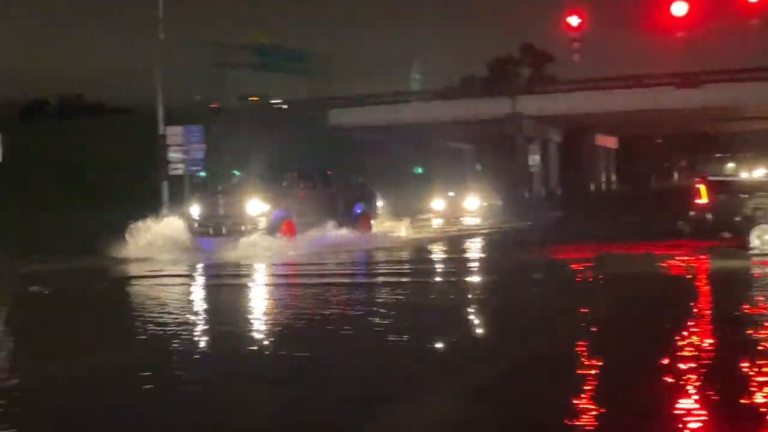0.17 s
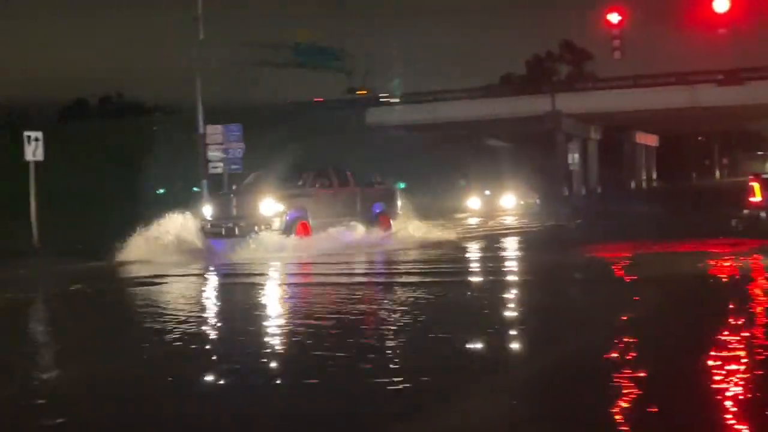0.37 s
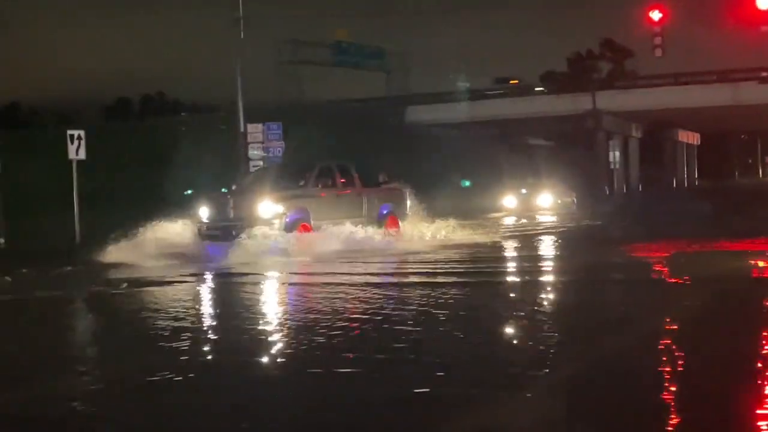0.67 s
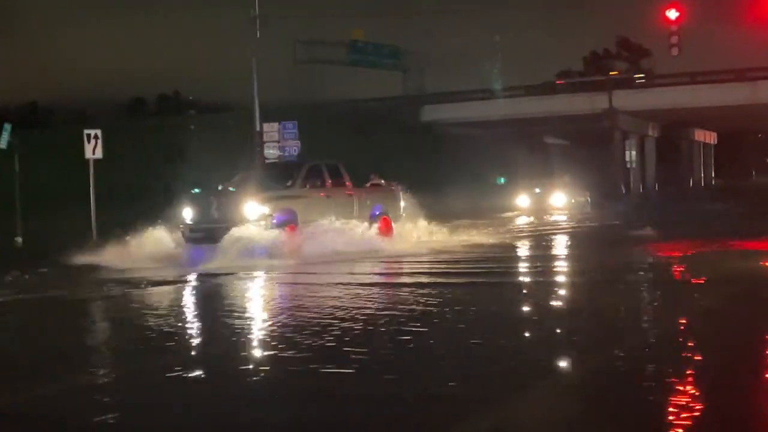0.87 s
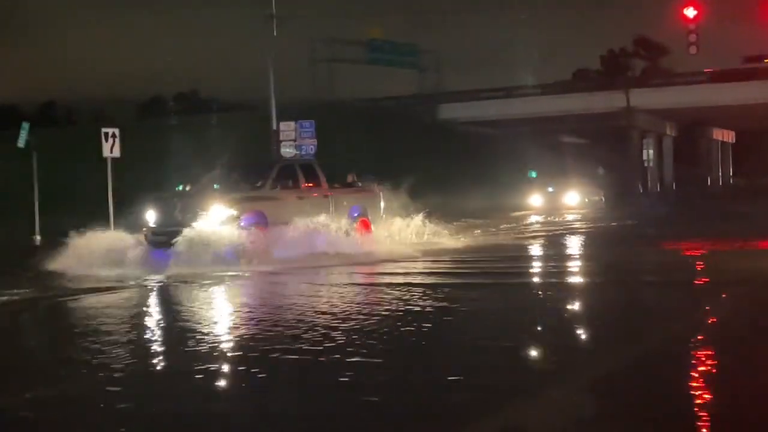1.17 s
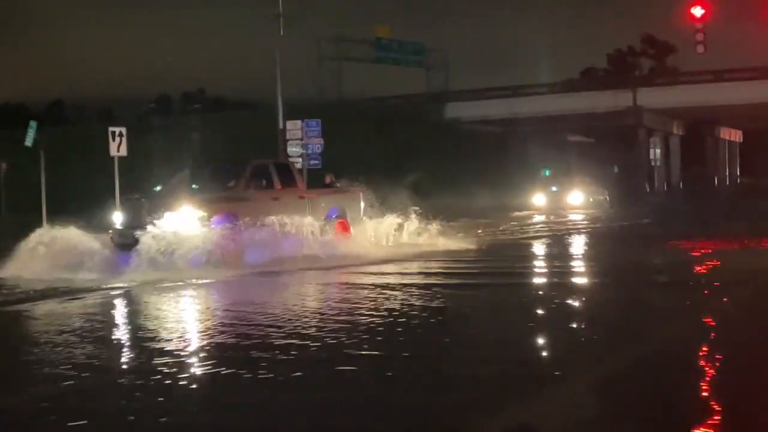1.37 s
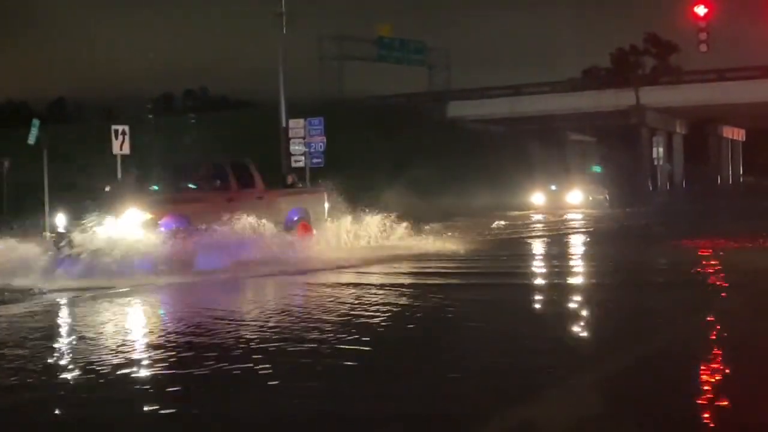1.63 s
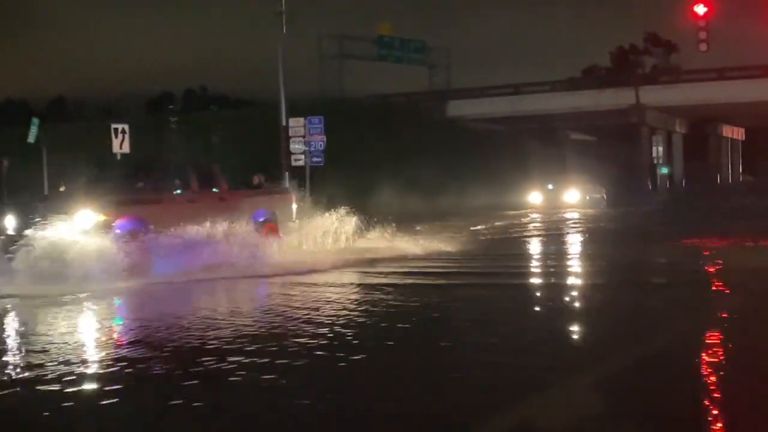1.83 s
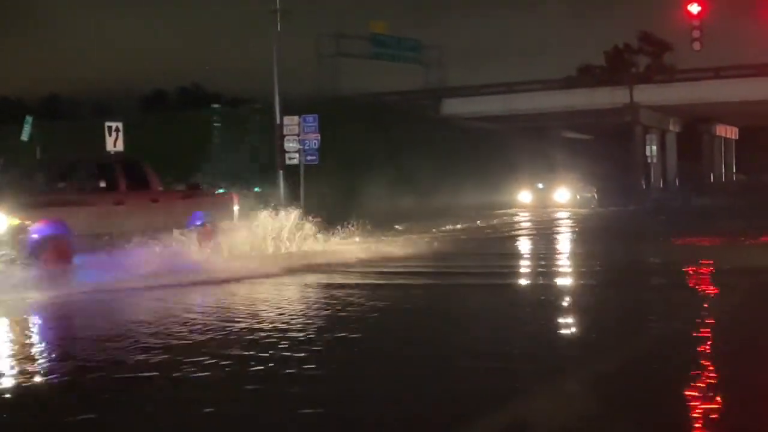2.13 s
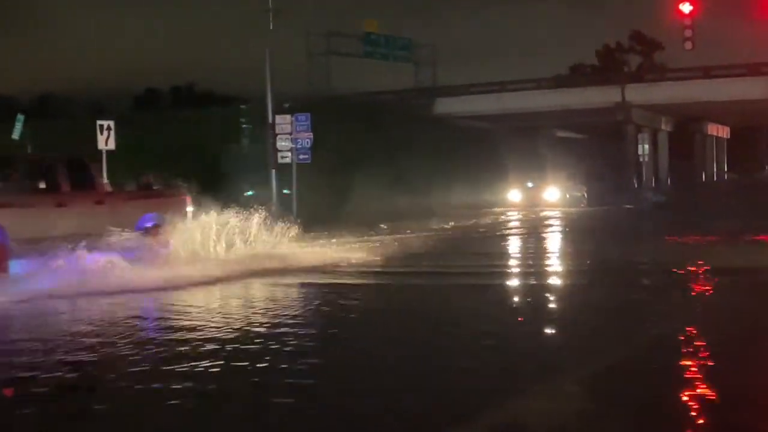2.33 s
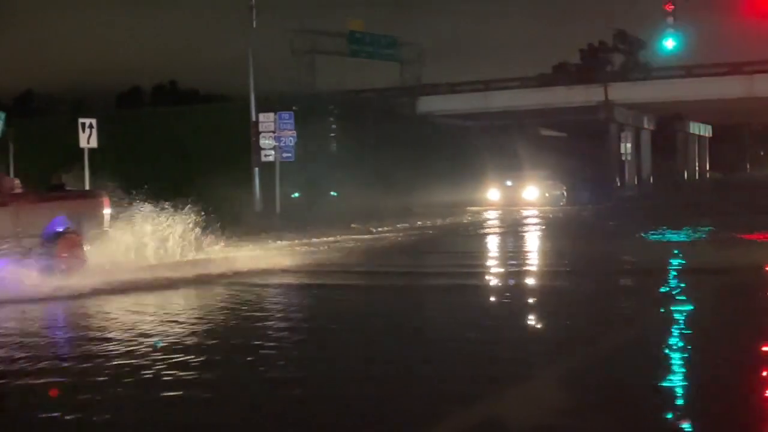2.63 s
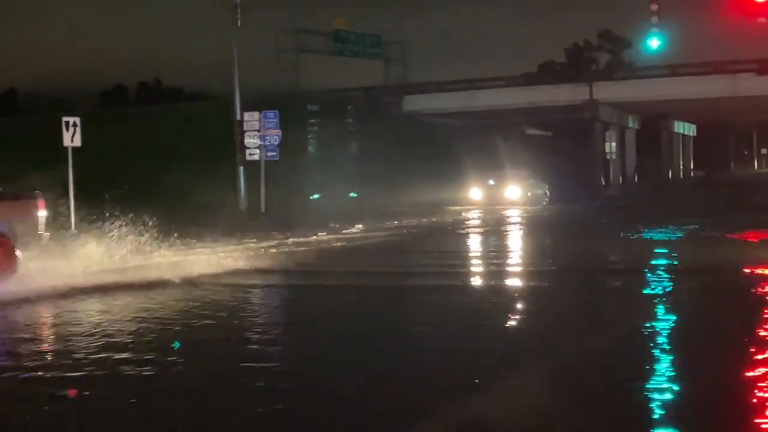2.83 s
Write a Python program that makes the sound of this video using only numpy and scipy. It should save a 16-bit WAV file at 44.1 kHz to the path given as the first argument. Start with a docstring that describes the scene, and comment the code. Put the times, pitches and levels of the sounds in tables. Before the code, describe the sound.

A pickup's burbling engine pushes through deep floodwater, with churning, sloshing water and growing spray hiss.

```python
"""An eight-cylinder pickup burbles through a flooded street and passes to the left, a few metres away.
Its exhaust, growl and tailpipe boom are sums of cosines at multiples of one engine cycle.
Around it water churns, sloshes and surges and spray hisses: coloured noise, with tiny rings for bubbles and drops.
The spray gets louder over the scene; a second engine, one wavering sine, hums farther off and fades."""
import sys
import numpy as np
from scipy import signal
from scipy.fft import rfft, irfft
from scipy.io import wavfile
from scipy.ndimage import uniform_filter1d

SR = 44100
rng = np.random.default_rng(int(sys.argv[2]) if len(sys.argv) > 2 else 0)


def waveform_to_disk(signal):
    """Save audio, clipped to [-1, 1], as 16-bit WAV at the path in sys.argv[1]."""
    frames = np.transpose(np.atleast_2d(signal))
    scaled = np.clip(frames, -1, 1) * 32767
    samples = np.round(scaled).astype(np.int16)
    wavfile.write(sys.argv[1], SR, samples)


N = 132300
T = np.arange(N) / SR  # seconds

# Pickup engine speed. Each row: time in seconds, firing rate in Hz.
FIRING_RATE = [(0, 104.9), (.5, 109.4), (1, 111.2), (1.4, 114.3), (1.8, 116.1), (2.1, 112.6), (2.4, 109.9),
               (2.7, 104.9), (3, 102.9)]
CYLINDERS = 8  # firings per engine cycle
# Exhaust loudness. Each row: time in seconds, level in dB.
EXHAUST_LEVEL = [(0, -29), (.3, -27), (.42, -29.5), (.5, -24.5), (.85, -25.3), (.95, -23.8), (1.3, -23.8),
                 (1.45, -21.5), (1.58, -26), (1.8, -22), (2.01, -27.5), (2.12, -22.5), (2.25, -27),
                 (2.38, -27), (2.57, -33), (2.66, -28.5), (3, -30)]
# Exhaust colour. Each row: multiple of the engine cycle, relative level in dB.
EXHAUST_ORDERS = [(4, -20), (5, -14.5), (6, -19.5), (7, -5.5), (8, 1.5), (9, -11), (10, -14), (11, -21)]
# Growl of the engine, heard while it faces us. Each row: multiple of the engine cycle, relative level in dB.
GROWL_ORDERS = [(16, 0.5), (17, 0), (19, -7), (21, -3), (24, -9)]
# Growl loudness. Each row: time in seconds, level in dB.
GROWL_LEVEL = [(0, -42), (.8, -40.5), (1.25, -35.5), (1.85, -33.5), (2.05, -36.5), (2.25, -46.5), (3, -44)]
BOOM_ORDER = 3  # tailpipe boom, as a multiple of the engine cycle
# Tailpipe boom loudness. Each row: time in seconds, level in dB.
BOOM_LEVEL = [(0, -60), (1.7, -52), (2.3, -44), (3, -40)]
# Distant engine. Each row: time in seconds, firing rate in Hz, level in dB.
FAR_ENGINE = [(0, 132, -28), (.35, 133.5, -28), (.6, 136, -31), (.85, 137, -37), (1.4, 137.6, -43),
              (3, 136.7, -61)]

# Colour of the bow wave. Each row: frequency in Hz, relative density in dB per Hz.
WAVE_COLOUR = [(200, -39), (340, -12), (450, -1.5), (570, -3.5), (750, -1), (1080, -1), (1250, -3.5),
               (1480, -4), (1700, -9.5), (1900, -8), (2200, -13.5), (3500, -20.5), (8000, -64)]
# Colour of the spray. Each row: frequency in Hz, relative density in dB per Hz.
SPRAY_COLOUR = [(700, -16), (1700, -5), (2600, 1), (3600, -.5), (5400, -2), (5900, -5), (6800, -10),
                (7800, -10), (8800, -11), (10500, -7.3), (13400, -7.2), (14600, -9), (15800, -14)]
# Colour of the low churn. Each row: frequency in Hz, relative density in dB per Hz.
RUMBLE_COLOUR = [(22, -42), (31, -28), (42, -12), (65, -1), (100, -4), (150, -.5), (200, -3.5), (250, -7),
                 (330, -7.5), (450, -10), (700, -33), (1500, -78)]
# Water noise loudness. Each row: time in seconds, rumble in dB, bow wave in dB, spray in dB.
WATER_LEVEL = [(0, -27.5, -34, -39), (.3, -29.5, -32, -40), (.55, -30.5, -32, -38.5),
               (.7, -30.5, -31.5, -38.5), (1.1, -30.5, -31.5, -37), (1.35, -30.5, -32.5, -37),
               (1.72, -31, -32, -36), (1.9, -31, -31, -34.7), (2.2, -30.5, -31, -34.7),
               (2.5, -30.5, -32, -35.7), (2.67, -28, -31, -35), (3, -27.5, -31.5, -34.3)]
# Single surges, from deep heaves to bright splashes.
# Each row: crest time in seconds, length in seconds, centre in Hz, crest level in dB.
SURGES = [(.24, .16, 780, -35), (.38, .16, 66, -32), (.68, .15, 860, -33.5), (.88, .22, 464, -33),
          (1.07, 0.17, 636, -36), (1.172, 0.22, 328, -35), (1.297, 0.14, 237, -34.5),
          (1.48, .18, 1400, -36.5), (1.64, .14, 72, -33), (1.82, 0.2, 74, -33), (1.89, .12, 1550, -34),
          (2.41, .16, 770, -35), (2.52, .2, 1200, -33.5)]
SURGE_OCTAVES, SURGE_RISE = .36, .4  # half width of a surge's band; share of its length before the crest
# Colour of the slosh against the body. Each row: frequency in Hz, relative density in dB per Hz.
SLOSH_COLOUR = [(170, -34), (255, 0.5), (370, 0), (650, -5.5), (1100, -29.5)]
# Slosh loudness. Each row: time in seconds, level in dB.
SLOSH_LEVEL = [(0, -52), (.85, -39), (1.35, -37), (1.8, -41), (2.2, -54), (3, -54)]
# Colour of the tail spray falling back. Each row: frequency in Hz, relative density in dB per Hz.
FALLBACK_COLOUR = [(3000, -28), (5200, -6), (6200, 5.5), (7200, 3), (8400, -4), (12000, -29)]
# Tail spray loudness. Each row: time in seconds, level in dB.
FALLBACK_LEVEL = [(0, -72), (1.6, -67), (2.2, -45.5), (3, -41)]

# Stereo width of the water. Each row: frequency in Hz, left-right likeness (clipped to 0-1).
LIKENESS = [(40, 0.8), (400, .92), (570, .6), (800, .84), (1150, .88), (1450, .99), (1700, .999),
            (2300, .999), (2900, .97), (3300, .88), (5000, .82), (8100, .72), (8400, .999), (9100, .99),
            (10000, .73), (12600, .78), (12900, 1.1)]
# Stereo lean of the water. Each row: frequency in Hz, left over right in dB at a lean share of 1.
LEAN = [(100, -1.3), (280, .9), (470, 0), (650, 8), (850, 4.7), (1220, 4), (1420, 0)]
LEAN_START, LEAN_PER_S = 0.2, 0.3  # lean share at the start; its growth per second
# Water reaches the two microphone ports out of step. Each row: frequency in Hz, left lead in radians.
PORT_PHASE = [(100, 0), (350, .15), (570, .55), (800, .1), (1100, .2), (1400, 0), (2400, 0), (3200, .35),
              (4200, .22), (5000, .55), (5350, .1), (5800, -1.55), (6300, -.95), (6900, -.85), (7550, -2.3),
              (8100, -2.45), (8400, -3.14), (9100, -3.2), (9900, -4), (11000, -4.65), (12650, -5.7),
              (12900, -6.283)]

# Rings per second in each channel, level in dB against the noise they sit in, spread of strength in dB.
BUBBLES_PER_S, BUBBLES_DB, BUBBLE_SPREAD_DB = 500, -8, 3.5
DROPS_PER_S, DROPS_DB, DROP_SPREAD_DB = 1800, -8, 2.5
EDGE_HZ = 15830  # top of the recorder's band


def amp(db):
    """Decibels to gain."""
    return 10 ** (np.asarray(db) / 20)


def unit(x):
    """Scales to rms 1."""
    return x / np.sqrt(np.mean(x ** 2) + 1e-20)


def curve(table, column=1):
    """One column of a time table, at every sample."""
    columns = np.transpose(table)
    return np.interp(T, columns[0], columns[column])


def colour(table, hz):
    """Reads a frequency table on a log-frequency axis."""
    table_hz, value = np.transpose(table)
    return np.interp(np.log(hz + 1), np.log(table_hz + 1), value)


def drift(hz):
    """Slow random waver up to about hz, rms 1."""
    f = np.fft.rfftfreq(N, 1 / SR)
    spectrum = rfft(rng.standard_normal(N)) / (1 + (f / hz) ** 4)
    return unit(irfft(spectrum, N))


def rush(spectrum, patchy_db, flicker_db, size=512):
    """Stereo water noise that comes in short patches of time and pitch, rms 1."""
    hz, _, z = signal.stft(rng.standard_normal((2, N)), SR, nperseg=size)
    # Blurring across pitch, then time, sets the patch size; both channels share the patches.
    patches = uniform_filter1d(rng.standard_normal(z.shape[1:]), size=7, axis=0)
    patches = unit(uniform_filter1d(patches, size=10, axis=1))
    noise = signal.istft(z * amp(patchy_db * patches), nperseg=size)[1][:, :N]
    tint = amp(colour(spectrum, np.fft.rfftfreq(N, 1 / SR)))
    noise = irfft(rfft(noise) * tint, N)
    return unit(noise * amp(flicker_db * drift(15)))


def grains(per_s, low_hz, high_hz, cycles, glide, spread_db, count=36):
    """Random small rings of many pitches, each rising a little as it dies, rms 1 in all."""
    out = np.zeros((2, N))
    for hz in np.geomspace(low_hz, high_hz, count):
        age = np.arange(4096) / SR * hz / cycles  # 1 = the given number of cycles
        envelope = np.exp(-3 * age) * (1 - np.exp(-20 * age))
        phase = 2 * np.pi * cycles * age * (1 + glide * np.minimum(age, 2))
        ring = envelope * np.sin(phase)
        starts = rng.random((2, N)) < per_s / count / SR
        hits = starts * amp(spread_db * np.minimum(rng.exponential(1, N), 4))
        out += signal.oaconvolve(hits, unit(ring)[None], axes=1)[:, :N]
    return unit(out)


def pickup(jitter=0.002, rough=0.13, growl_rough=0.37, balance_db=-1.3):
    """Unevenly spaced firings give lines at multiples of the engine cycle, not only at the firing rate."""
    firing_hz = curve(FIRING_RATE) * (1 + jitter * drift(9.1))
    turns = np.cumsum(firing_hz) / CYLINDERS / SR  # engine cycles so far

    def lines(orders, waver):
        """Engine lines that each waver in strength, rms 1 together."""
        total = 0
        for order, db in orders:
            strength = amp(db) * (1 + waver * drift(14.3))
            total = total + strength * np.cos(2 * np.pi * (round(order) * turns + rng.random()))
        return unit(total)

    exhaust = lines(EXHAUST_ORDERS, rough) * amp(curve(EXHAUST_LEVEL))
    growl = lines(GROWL_ORDERS, growl_rough) * amp(curve(GROWL_LEVEL))
    boom = lines([(BOOM_ORDER, 0)], rough) * amp(curve(BOOM_LEVEL))
    left_right = amp([[balance_db / 2], [-balance_db / 2]])
    return (exhaust + growl + boom) * left_right


def bow_wave():
    """The wave is a broad rush of water, full of ringing bubbles."""
    bubbles = grains(BUBBLES_PER_S, low_hz=416.3, high_hz=1903, cycles=13, glide=0.041,
                     spread_db=BUBBLE_SPREAD_DB)
    wave = rush(WAVE_COLOUR, patchy_db=1, flicker_db=0.0)
    return (wave + amp(BUBBLES_DB) * bubbles) * amp(curve(WATER_LEVEL, column=2))


def surges():
    """Each surge swells and collapses in its own band: the larger the mass of water, the lower."""
    octave = np.log2(np.fft.rfftfreq(N, 1 / SR) + 1)
    out = np.zeros((2, N))
    for crest, length, hz, db in SURGES:
        band = np.exp(-.5 * ((octave - np.log2(hz)) / SURGE_OCTAVES) ** 2)
        age = (T - crest) / length  # 0 at the crest
        swell = np.exp(-(age / np.where(age < 0, SURGE_RISE, 1 - SURGE_RISE)) ** 2)
        noise = unit(irfft(rfft(rng.standard_normal((2, N))) * band, N))
        out += noise * swell * amp(db)
    return out


def spray():
    """Sheets of spray hiss and patter with drops; the tail spray falls back behind the truck."""
    drops = grains(DROPS_PER_S, low_hz=1910, high_hz=6100, cycles=4.9, glide=0.034,
                   spread_db=DROP_SPREAD_DB)
    hiss = rush(SPRAY_COLOUR, patchy_db=0.9, flicker_db=0.5)
    sheets = (hiss + amp(DROPS_DB) * drops) * amp(curve(WATER_LEVEL, column=3))
    fallback = rush(FALLBACK_COLOUR, patchy_db=0.5, flicker_db=0.8) * amp(curve(FALLBACK_LEVEL))
    return sheets + fallback


def slosh():
    """Water surges against the body and wheel wells, loudest as the truck draws level."""
    return rush(SLOSH_COLOUR, patchy_db=1.0, flicker_db=0.7) * amp(curve(SLOSH_LEVEL))


def rumble():
    """Low churn of wheels and body pushing water."""
    return rush(RUMBLE_COLOUR, patchy_db=1, flicker_db=1.04) * amp(curve(WATER_LEVEL, column=1))


def far_engine(rough=0.15):
    """A distant engine heard as one firing note that wavers in strength."""
    turns = np.cumsum(curve(FAR_ENGINE)) / SR + rng.random()
    note = np.sin(2 * np.pi * turns) * (1 + rough * drift(13))
    return unit(note) * amp(curve(FAR_ENGINE, column=2))


def place(pair):
    """Mixes two unrelated signals to the wanted likeness, with a lean that grows over time."""
    hz, t, (a, b) = signal.stft(pair, SR, nperseg=1024, noverlap=768)
    like = np.clip(colour(LIKENESS, hz), 0, 1)[:, None]
    mid = a * np.sqrt((1 + like) / 2)
    side = b * np.sqrt((1 - like) / 2)
    lean = amp(colour(LEAN, hz)[:, None] * (LEAN_START + LEAN_PER_S * t))
    lead = np.exp(1j * colour(PORT_PHASE, hz))[:, None]
    keep_power = np.sqrt(2 / (1 + lean ** 2))
    z = np.array([(mid + side) * lean * lead, mid - side]) * keep_power
    return signal.istft(z, nperseg=1024, noverlap=768)[1][:, :N]


def scene():
    """Both engines over the water; only the water goes through the stereo placement."""
    water = bow_wave() + surges() + spray() + slosh() + rumble()
    return pickup() + place(water) + far_engine()


def record(dry):
    """The recorder's band limit: a steep low-pass."""
    low_pass = signal.firwin(801, EDGE_HZ, window=("kaiser", 9), fs=SR)
    return signal.oaconvolve(dry, low_pass[None], "same")


dry = scene()
out = record(dry)
waveform_to_disk(out)
```